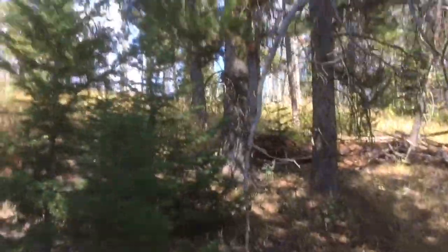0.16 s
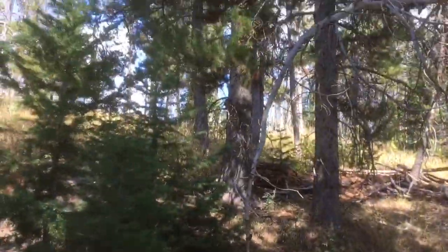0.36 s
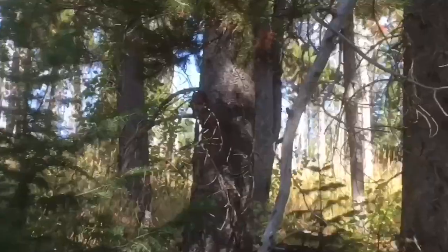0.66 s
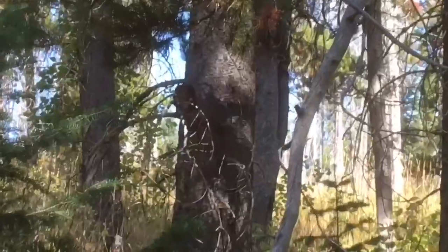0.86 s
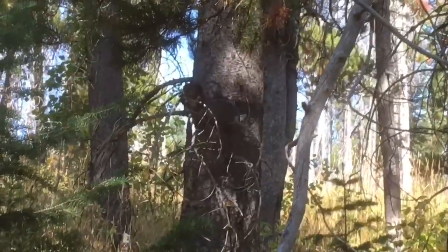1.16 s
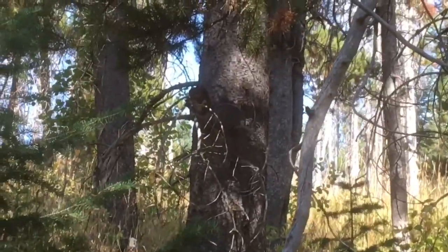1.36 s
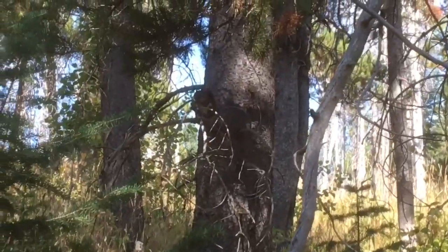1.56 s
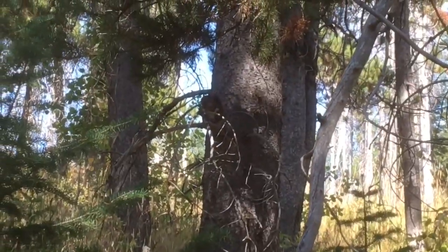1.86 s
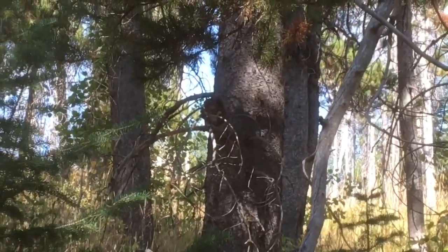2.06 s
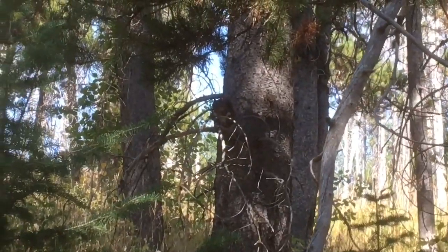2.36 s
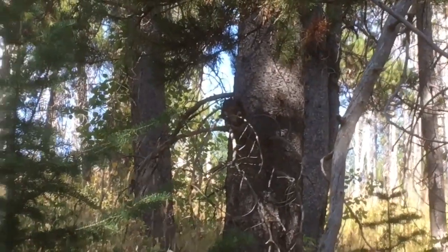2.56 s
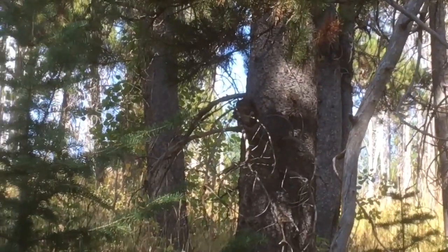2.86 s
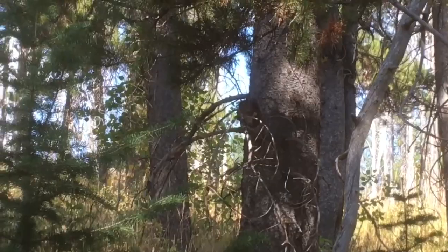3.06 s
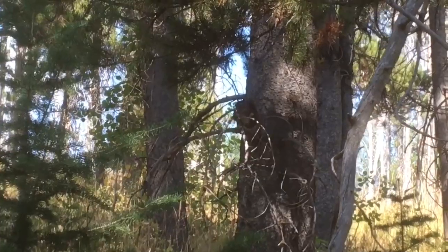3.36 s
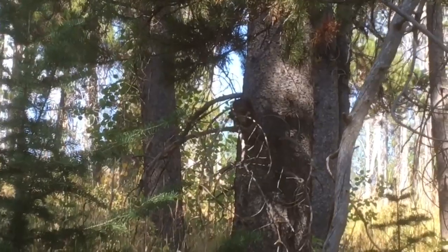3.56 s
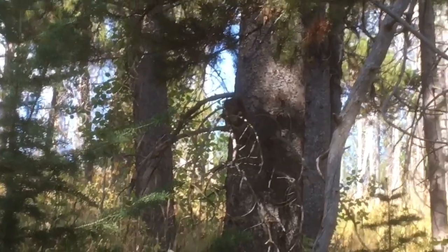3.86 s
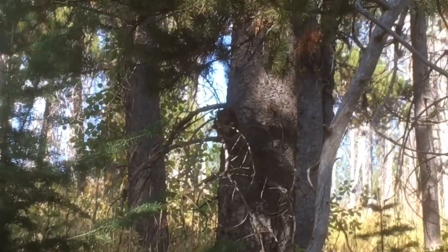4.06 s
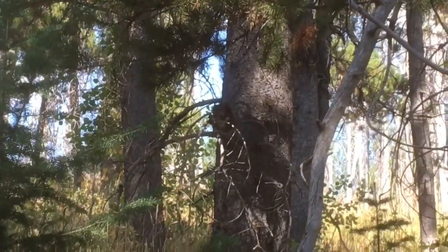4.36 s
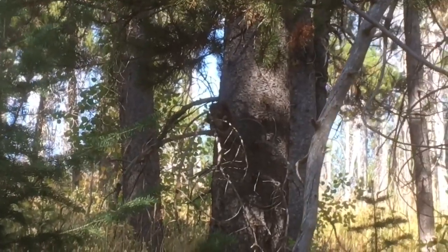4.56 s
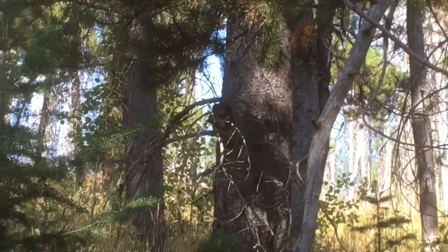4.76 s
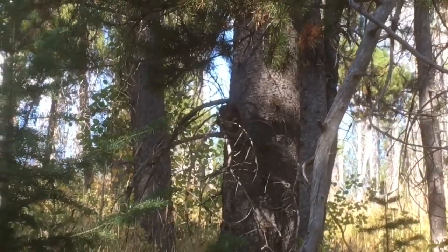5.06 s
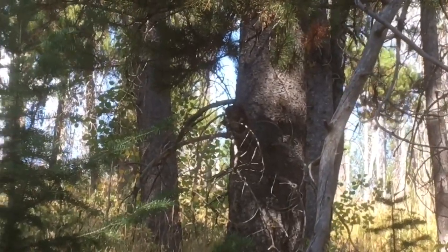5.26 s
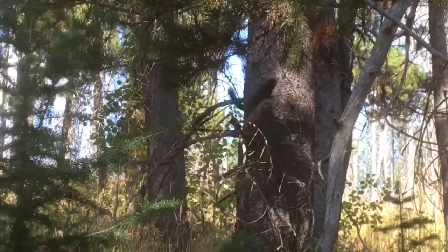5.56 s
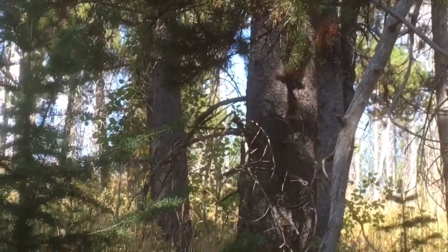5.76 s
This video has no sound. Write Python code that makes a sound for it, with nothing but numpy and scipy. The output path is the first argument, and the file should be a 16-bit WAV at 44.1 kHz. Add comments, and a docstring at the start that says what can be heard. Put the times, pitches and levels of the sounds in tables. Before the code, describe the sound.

A close, mono outdoor perspective in a still pine forest, with very faint murmur, needle hiss and lumps of low wind rumble. The opening 0.2 s has small clicks, dull bumps on the camera and a gust-like thud. From 0.4 to 0.8 s gear knocks and crackles lightly, strongest near 0.6 s. Sparse woody taps and dry ticks continue. A fly buzzes faintly in brief passes, circling nearest from 1.8 to 2.3 s. More bumps and knocks cluster at 2.55-2.9 s and 3.2 s, then a tick at 3.75 s and a low bump at 3.9 s. It becomes nearly silent after 4.5 s. At 5.37 s a tiny release scrape leads to a bright string crack at 5.4 s, then a much louder hard slam at 5.46 s with short woody-metallic ringing. Faint echoes and a diffuse wash decay through the trees, with small rattles and ticks until about 5.9 s.

```python
"""A bow is shot close by in a quiet pine forest: the release scrapes, the string cracks free and slaps,
and blows set the bow's modes ringing. Shaped noise makes the friction, sines that die away make the ring.
The trunks answer with faint echoes and a wash of noise. Knocks, bumps, ticks and crackle are short sines and noise.
A fly buzzes in wing-beat overtones; wandering noise makes the wind's rumble and the forest's murmur and hiss."""
import sys
import numpy as np
from scipy import signal
from scipy.fft import rfft, irfft, next_fast_len
from scipy.io import wavfile
from scipy.ndimage import map_coordinates

SR = 44100
rng = np.random.default_rng(int(sys.argv[2]) if len(sys.argv) > 2 else 0)


def bounce(signal):
    """Save signal as a 16-bit WAV file at the path given by the first command-line argument."""
    frames = np.transpose(np.atleast_2d(signal))
    limited = np.clip(frames, -1, 1)
    pcm = np.round(limited * 32767).astype(np.int16)
    wavfile.write(sys.argv[1], SR, pcm)


def amplitude_ratio(level_db):
    """Convert a level in decibels to the matching linear amplitude (field) ratio."""
    exponent = np.asarray(level_db, float) / 20
    return 10 ** exponent


N = 261191
T = np.arange(N) / SR  # time of every sample, s

# friction bursts of release, string and arrow, each a crack and a slower wake:
# start_s, crack_db, crack_tilt_db_per_octave, wake_db, wake_tilt_db_per_octave
SCRAPES = [(5.3719, -40, 0.5, -46.5, 2.5), (5.391, -44, -2, -56, 1), (5.3948, -19.5, -0.5, -29.5, -2),
           (5.408, -24, -2.5, -42, -8.5), (5.436, -34.5, .5, -53, -4), (5.446, -31, 7, -37, -1),
           (5.461, -12.5, -.5, -24, -.5)]
# tone colour of the friction: pitch_hz, relative_db
SCRAPE_COLOUR = [(100, -44), (200, -14.5), (400, -12), (800, -15), (1300, -6.5), (2000, -10), (5000, -12),
                 (9000, -14), (10500, -20), (13000, -23), (15500, -29), (16400, -57)]
CRACK_RISE_S, CRACK_T60_S = 0.00039, 0.034  # t60: time to fall by 60 dB
WAKE_RISE_S, WAKE_T60_S = 0.0031, 0.24
RATTLE_DB, RATTLES_PER_S = 2.5, 170  # the wake is uneven
# the string cracks free, one row: start_s, level_db, start_hz, end_hz, pitch_fall_s, t60_s
SNAP = (5.3962, -10, 5500, 4700, .002, .014)
SLAP_S = 5.3985  # the freed string slaps
# the modes of the slapping string: pitch_hz, level_db, t60_s
STRING_MODES = [(165, -26, .06), (265, -17, .05), (372, -27, .2), (640, -19, .035), (1300, -19, .035),
                (1800, -24, .035), (2200, -29, .04)]
# two blows into the bow, then two fainter echoes of them from the trunks;
# sharper ones hardly move its low modes: start_s, level_db, loss_db_per_octave (under 1500 Hz)
BLOWS_AND_ECHOES = [(5.4608, -13.5, 0), (5.4634, -9.5, 11.5), (5.4826, -25.5, 13), (5.4951, -28.5, 24)]
# the bow's ringing modes: pitch_hz (once settled), relative_db, t60_s
BOW_MODES = [(188, -15, 0.062), (298, -16, 0.081), (380, -34, 0.52), (582, -10, 0.24), (966, -6, 0.23),
             (1055, 1.5, 0.019), (1163, -9, 0.11), (1275, -2, 0.048), (1380, -3, 0.046), (1724, 7.5, 0.028),
             (1900, -10, 0.14), (1932, -12, 0.17), (2185, 5, 0.032), (2600, -22, 0.12), (2880, -3.5, 0.033),
             (3130, -22.5, .14), (3300, 4, 0.02), (3840, -28.5, 0.26), (3940, 0.5, 0.013),
             (4500, -39, 0.107)]
SLAM_S = 5.46  # the wash from the forest starts here
# the wash from the forest: pitch_hz, level_db, t60_s
TRUNKS = [(150, -62, 0.395), (500, -59, 0.42), (1000, -32, 0.81), (2000, -27, 1.0), (3000, -34.5, 0.93),
          (4500, -32, 0.53), (9950, -51, 0.56), (16000, -66.5, 0.377)]
# small knocks of gear and wood: start_s, level_db, start_hz, end_hz
KNOCKS = [(.009, -45, 1500, 900), (.021, -43, 3600, 3400), (0.388, -48, 1780, 1500),
          (.436, -40, 3230, 2880), (0.515, -47, 1095, 500), (.5605, -41.5, 1410, 1000),
          (0.5645, -38, 1470, 580), (0.5942, -33.5, 2160, 1900), (0.653, -47, 2190, 2000),
          (.729, -43.5, 1370, 1000), (.792, -46, 1200, 1080), (1.055, -42.5, 1520, 1000),
          (1.355, -48, 1300, 1120), (1.756, -45.5, 1580, 698), (2.548, -44.5, 1314, 500),
          (2.822, -40, 1367, 522), (2.849, -46, 1280, 798), (2.904, -51, 1290, 1000),
          (3.189, -43.5, 2000, 1070), (3.216, -44.5, 1486, 886), (3.305, -48.5, 1396, 1100),
          (3.741, -48.5, 1503, 703), (3.755, -45, 1800, 500), (4.422, -46, 2500, 1500)]
KNOCK_CYCLES = 16  # swings at the end pitch in one t60
# dull bumps on the camera body: start_s, level_db, pitch_hz
BUMPS = [(0.032, -33, 55.3), (0.144, -35, 88), (0.562, -35.5, 308), (2.564, -33, 134), (2.589, -36, 225.6),
         (2.65, -40, 164.4), (2.851, -38, 205), (2.864, -40.5, 207), (3.877, -44, 380), (3.91, -31, 70.4)]
BUMP_CYCLES = 6.1  # swings in one t60
# dry ticks: start_s, level_db, low_db (lift of the part up to about 4 kHz, before rescaling)
TICKS = [(0.5685, -41, 6), (1.1709, -42.5, -7.5), (1.926, -43, -14), (2.6226, -45, -7.5),
         (3.4174, -49, -13), (3.7541, -36, 12), (4.017, -43, -14), (4.5202, -45, 8), (5.56, -34, 0),
         (5.574, -38, -5), (5.62, -50, -10), (5.7565, -42, -8), (5.775, -47, -7), (5.9, -50, -8)]
# spells of crackle while gear shifts, and of rattling after the slam:
# middle_s, half_length_s, typical_grain_db, typical_pitch_hz
CRACKLES = [(.39, .02, -51, 1800), (.545, .05, -50, 1100), (2.875, .045, -58, 810), (3.22, .04, -56, 1400),
            (5.53, 0.054, -41, 6960), (5.62, 0.032, -50, 7000), (5.89, .03, -59, 7950)]
GRAINS_PER_S, GRAIN_CYCLES = 160, 6.5  # cycles: swings in one t60
GRAIN_SPREAD_DB, GRAIN_PITCH_SPREAD = 5, 0.4  # pitch spread is in natural-log units
TOP_HZ = 16500  # highest grain pitch, and the band limit of the input stage
# the fly circles close: time_s, wing_beat_hz, level_db, brightness_db_per_octave
FLY = [(1.77, 265, -77, -5), (1.8, 270.7, -67, -9), (1.845, 259.2, -63.5, -8.5), (1.857, 256, -71, -3),
       (1.87, 266, -60.5, -3.5), (1.9, 253.3, -69, -1.5), (1.93, 248.5, -88, 6), (1.97, 258.3, -75, -6),
       (2.0, 255.4, -67.5, -4), (2.07, 237.7, -75, -4.5), (2.092, 258.3, -71, -1.5),
       (2.122, 247, -68, -3.5), (2.145, 261.5, -70.5, -0.5), (2.25, 244.5, -74.5, -2.5),
       (2.29, 254.2, -75, -1), (2.38, 255, -85, -1)]
# the fly passes further off: start_s, length_s, level_db, wing_beat_hz (at the start)
PASSES = [(0.722, .06, -74.5, 252.5), (0.899, 0.055, -78, 239.3), (1.049, 0.097, -75.5, 268),
          (1.329, 0.053, -76, 249.9), (1.469, 0.066, -76, 252.3), (2.438, 0.081, -75.5, 247.2),
          (2.573, .09, -73, 261.7), (2.711, .08, -77, 246.3), (2.95, .14, -81, 249.7),
          (3.352, 0.0703, -79.5, 263.6), (3.647, 0.063, -88, 260), (3.768, .095, -73, 256.9),
          (4.041, 0.071, -78.5, 258), (4.496, 0.049, -78.5, 254)]
SAG_HZ_PER_S = 70  # the beat slows through a pass
PASS_FADE_S, PASS_BRIGHT_DB_PER_OCTAVE, GONE_DB = 0.035, -4, -84
# tone colour of the buzz: pitch_hz, relative_db
WING_COLOUR = [(250, -5), (500, 1), (770, -8), (1030, 2.5), (1300, 3), (1550, -4), (1800, -0.5),
               (2300, -1.5), (2900, -4), (4300, -7.5), (6500, -9.5), (9000, -26)]
# the highest treble swells softly, like dry leaves stirring: middle_s, half_length_s, level_db
STIRS = [(.9, 0.25, -81), (2.274, 0.14, -79), (2.881, .08, -81)]
# broad puffs of hiss, at the very start and after the shot: middle_s, half_length_s, level_db
PUFFS = [(.02, 0.019, -60), (5.7, 0.18, -67)]
# wind on the microphone: time_s, rumble_db
WIND = [(0.0, -52), (0.05, -33.5), (0.1, -58), (0.16, -41), (0.21, -61), (0.61, -49), (0.71, -54),
        (1.75, -54), (2.24, -66.5), (2.6, -61), (3.25, -67), (3.4, -53.5), (3.66, -58), (3.92, -40.5),
        (3.96, -53), (4.42, -63.5), (4.53, -54), (4.57, -70), (5.04, -50.5), (5.14, -68.5), (5.24, -58),
        (5.85, -56.5), (5.92, -68)]
# breeze in the trees: time_s, murmur_db, needle_hiss_db
BREEZE = [(0, -62, -72), (.45, -58.5, -71), (.8, -60, -71), (1.15, -62, -73.5), (1.7, -62, -74.5),
          (1.9, -62.5, -70.5), (2.6, -62.5, -71.5), (3.3, -62.5, -74.5), (5.3, -64.5, -75),
          (5.92, -61, -72)]
# tone colour of the wind's rumble: pitch_hz, relative_db
RUMBLE_COLOUR = [(15, -55), (25, -28), (33, -8.5), (43, 5.5), (59, 3), (73, 1.5), (110, -9.5), (173, -24.5),
                 (250, -29.5), (400, -78)]
# tone colour of the far forest's murmur: pitch_hz, relative_db
MURMUR_COLOUR = [(71, -1), (120, -5), (268, -2.5), (337, -1), (498, -3.5), (669, -6.5), (1880, -11),
                 (2250, -16.5), (6000, -33.5), (7800, -56), (13200, -120)]
# tone colour of the hiss: pitch_hz, relative_db
HISS_COLOUR = [(1760, -11.5), (3000, -3), (3530, -4), (4220, -4.5), (4900, -8), (6510, -5.5), (7720, -9),
               (9490, -7.5), (10500, -13.5), (12900, -9.5), (15400, -21), (16100, -23), (16400, -21)]


def unit(x):
    """Scale to an rms of 1."""
    return x / np.sqrt(np.mean(x ** 2) + 1e-20)


def along(points, hz):
    """Read a curve of pitch and value points, with pitch on a log axis."""
    point_hz, value = np.transpose(points)
    return np.interp(np.log(hz + 1), np.log(point_hz + 1), value)


def curves(rows):
    """Give one value per sample for each column after the time."""
    time_s, *columns = np.transpose(rows)
    return [np.interp(T, time_s, column) for column in columns]


def wobble(rate):
    """Draw a smooth random curve with this many knots a second."""
    knots = rng.standard_normal(int(N * rate / SR) + 4)
    return map_coordinates(knots, [T * rate])


def noise(size, db_of_hz):
    """Colour random noise by a level curve, at an rms of about 1."""
    hz = np.fft.rfftfreq(next_fast_len(size + 8192), 1 / SR)
    spectrum = rfft(rng.standard_normal(2 * len(hz) - 2))
    return unit(irfft(spectrum * amplitude_ratio(db_of_hz(hz)))[:size])


def add(track, start_s, sound):
    """Mix a sound into a track at its start time."""
    part = track[round(start_s * SR):][:len(sound)]
    part += sound[:len(part)]


def fade(t, rise_s, t60_s):
    """A soft rise, then an exponential fall."""
    return (1 - np.exp(-t / rise_s)) * amplitude_ratio(-60 * t / t60_s)


def falling(t, start_hz, end_hz, fall_s):
    """A sine whose pitch glides from start to end, fast at first."""
    glide = (start_hz - end_hz) * fall_s * (1 - np.exp(-t / fall_s))
    return np.sin(2 * np.pi * (end_hz * t + glide))


def swells(rows):
    """Flat-topped swells of level from rows of middle, half length and dB."""
    return sum(amplitude_ratio(db) * np.exp(-((T - middle_s) / half_s) ** 4) for middle_s, half_s, db in rows)


def grit(size, tilt_db):
    """Friction is a rough noise, tilted darker or brighter around 3 kHz."""
    return noise(size, lambda hz: along(SCRAPE_COLOUR, hz) + tilt_db * np.log2(hz / 3000 + 0.015))


def scrapes():
    """Each friction burst is a sharp crack of noise with a slower, uneven wake."""
    out, t = np.zeros(N), T[:SR // 2]
    for start_s, crack_db, crack_tilt_db, wake_db, wake_tilt_db in SCRAPES:
        crack = amplitude_ratio(crack_db) * fade(t, CRACK_RISE_S, CRACK_T60_S) * grit(len(t), crack_tilt_db)
        uneven_db = wake_db + RATTLE_DB * wobble(RATTLES_PER_S)[:len(t)]
        wake = amplitude_ratio(uneven_db) * fade(t, WAKE_RISE_S, WAKE_T60_S) * grit(len(t), wake_tilt_db)
        add(out, start_s, crack + wake)
    return out


def string():
    """The string snaps free with a sinking chirp, then slaps; its low modes swell later than its high ones."""
    out, t = np.zeros(N), T[:SR // 2]
    start_s, level_db, start_hz, end_hz, fall_s, t60_s = SNAP
    add(out, start_s, amplitude_ratio(level_db) * fade(t, 0.001, t60_s) * falling(t, start_hz, end_hz, fall_s))
    for hz, db, mode_t60_s in STRING_MODES:
        add(out, SLAP_S, amplitude_ratio(db) * fade(t, 0.67 / hz, mode_t60_s) * np.sin(2 * np.pi * hz * t))
    return out


def bow():
    """Blows ring the bow's modes, which start flat and climb as it settles; echoes repeat them fainter."""
    out, t = np.zeros(N), T[:SR // 2]
    modes = []
    for k, (hz, db, t60_s) in enumerate(BOW_MODES):
        sign = (-1) ** k  # neighbouring modes start in opposite directions
        modes.append(sign * amplitude_ratio(db) * fade(t, 0.00062, t60_s) * falling(t, 0.96 * hz, hz, 0.019))
    octaves_under = np.maximum(np.log2(1500 / np.array(BOW_MODES)[:, 0]), 0)
    for start_s, db, loss_db in BLOWS_AND_ECHOES:
        add(out, start_s, amplitude_ratio(db - loss_db * octaves_under) @ np.array(modes))
    return out


def forest():
    """Countless trunks scatter the slam into a wash that swells late; each pitch dies at its own speed."""
    out = np.zeros(N)
    hz, t, spectrum = signal.stft(rng.standard_normal(SR // 2), SR, nperseg=256)
    colour = amplitude_ratio(along([(f, db) for f, db, _ in TRUNKS], hz))[:, None]
    t60_s = along([(f, t60) for f, _, t60 in TRUNKS], hz)[:, None]
    wash = signal.istft(spectrum * colour * fade(t, 0.061, t60_s), SR, nperseg=256)[1]
    add(out, SLAM_S, wash)
    return out


def knocks():
    """Struck gear and wood ring briefly with sinking pitch, under a short crack of noise."""
    out, t = np.zeros(N), T[:SR // 4]
    colour = [(300, -12), (1000, 9), (3000, -9), (9000, -26.5)]  # pitch_hz, relative_db
    for start_s, db, start_hz, end_hz in KNOCKS:
        ring = fade(t, 0.0004, KNOCK_CYCLES / end_hz) * falling(t, start_hz, end_hz, 0.00143)
        crack = 0.48 * fade(t, 0.00017, 0.016) * noise(len(t), lambda hz: along(colour, hz))
        add(out, start_s, amplitude_ratio(db) * (ring + crack))
    return out


def bumps():
    """A bumped camera body makes a few low swings that die quickly."""
    out, t = np.zeros(N), T[:SR // 4]
    for start_s, db, hz in BUMPS:
        swing = falling(t, 1.03 * hz, hz, 0.45 / hz)
        add(out, start_s, amplitude_ratio(db) * fade(t, 0.23 / hz, BUMP_CYCLES / hz) * swing)
    return out


def ticks():
    """Dry ticks are very short puffs of noise, some dull and some all treble."""
    out, t = np.zeros(N), T[:SR // 4]
    for start_s, db, low_db in TICKS:
        colour = [(300, low_db - 25), (1500, low_db + 11), (4000, low_db + 0.5),
                  (8000, -7.5), (14000, -5.5), (16500, -23)]  # pitch_hz, relative_db
        puff = noise(len(t), lambda hz: along(colour, hz))
        add(out, start_s, amplitude_ratio(db) * fade(t, 0.00025, 0.0066) * puff)
    return out


def crackle():
    """Short damped sines at chance times, sizes and pitches inside each spell."""
    out, t = np.zeros(N), T[:SR // 40]
    for middle_s, half_s, db, typical_hz in CRACKLES:
        for _ in range(round(2 * half_s * GRAINS_PER_S)):
            size, pitch = rng.standard_normal(2)
            hz = min(typical_hz * np.exp(GRAIN_PITCH_SPREAD * pitch), TOP_HZ)
            grain = fade(t, 0.0002, GRAIN_CYCLES / hz) * np.sin(2 * np.pi * hz * t)
            start_s = middle_s + half_s * rng.uniform(-1, 1)
            add(out, start_s, amplitude_ratio(db + GRAIN_SPREAD_DB * size) * grain)
    return out


def flight():
    """Beat, level and brightness of the fly: close circling, and far passes that fade in, sag and fade out."""
    far = []
    for start_s, length_s, db, hz in PASSES:
        shape = [(-PASS_FADE_S, GONE_DB), (0, db), (length_s, db), (length_s + PASS_FADE_S, GONE_DB)]
        for since_s, level_db in shape:
            beat_hz = hz - SAG_HZ_PER_S * since_s
            far.append((start_s + since_s, beat_hz, level_db, PASS_BRIGHT_DB_PER_OCTAVE))
    return curves(sorted(FLY + far))


def fly():
    """Overtones of a trembling wing beat, brighter when the fly turns towards the microphone."""
    beat_hz, level_db, bright_db = flight()
    turns = np.cumsum(beat_hz * (1 + 0.006 * wobble(80))) / SR
    buzz = np.zeros(N)
    for k in range(1, 31):
        overtone_db = along(WING_COLOUR, k * beat_hz) + bright_db * np.log2(k / 4) + 2.2 * wobble(18)
        buzz += amplitude_ratio(overtone_db) * np.sin(2 * np.pi * k * turns + rng.uniform(0, 2 * np.pi))
    return np.sqrt(2) * amplitude_ratio(level_db) * buzz


def stirs():
    """Soft, flickering swells of hiss in the highest treble."""
    colour = [(8000, -42), (11000, 0), (13500, -3), (16000, -16)]  # pitch_hz, relative_db
    return swells(STIRS) * amplitude_ratio(2.8 * wobble(29.6)) * noise(N, lambda hz: along(colour, hz))


def wind():
    """Wind pressing on the microphone rumbles in lumps of low noise."""
    rumble_db, = curves(WIND)
    rumble = unit(amplitude_ratio(1.2 * wobble(10)) * noise(N, lambda hz: along(RUMBLE_COLOUR, hz)))
    return amplitude_ratio(rumble_db) * rumble


def breeze():
    """Moving air makes the far forest murmur and the needles hiss; two broad puffs of hiss come on top."""
    murmur_db, hiss_db = curves(BREEZE)
    murmur = amplitude_ratio(1.4 * wobble(24)) * noise(N, lambda hz: along(MURMUR_COLOUR, hz))
    hiss = amplitude_ratio(1.2 * wobble(14)) * noise(N, lambda hz: along(HISS_COLOUR, hz))
    return amplitude_ratio(murmur_db) * murmur + (amplitude_ratio(hiss_db) + swells(PUFFS)) * hiss


def scene():
    """The shot and its echoes over the quiet forest, in one channel."""
    shot = scrapes() + string() + bow()
    handling = knocks() + bumps() + ticks() + crackle()
    return (shot + forest() + handling + fly() + stirs() + wind() + breeze())[None]


def top_cut(x):
    """Nothing passes above the cut-off."""
    return signal.sosfilt(signal.butter(12, 16640, fs=SR, output="sos"), x)


def record(dry):
    """The input stage rounds off the loudest peaks and ends at its band limit."""
    top, hardness = 0.97, 6  # top: the level that peaks cannot pass; harder means a sharper bend
    rounded = dry / (1 + np.abs(dry / top) ** hardness) ** (1 / hardness)
    band_limit = signal.butter(12, TOP_HZ, fs=SR, output="sos")
    limited = signal.sosfiltfilt(band_limit, rounded)
    return top_cut(limited)


dry = scene()
out = record(dry)
bounce(out)
```